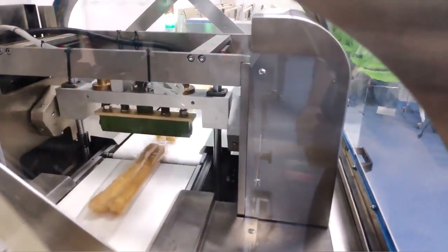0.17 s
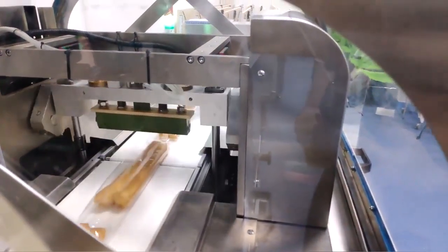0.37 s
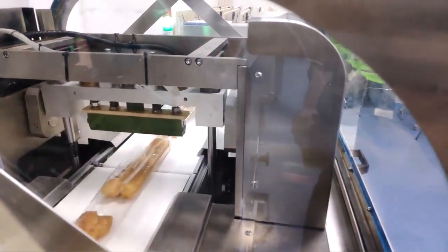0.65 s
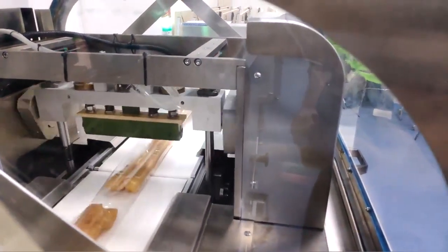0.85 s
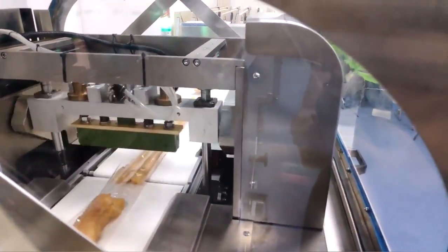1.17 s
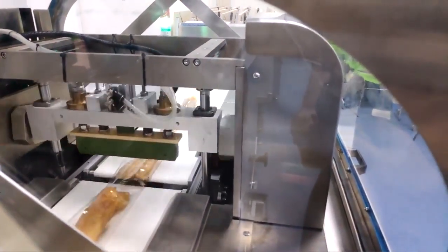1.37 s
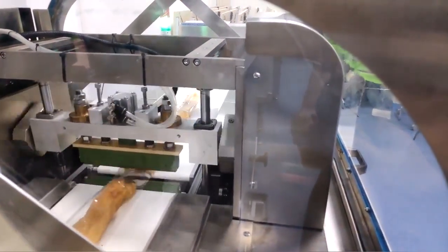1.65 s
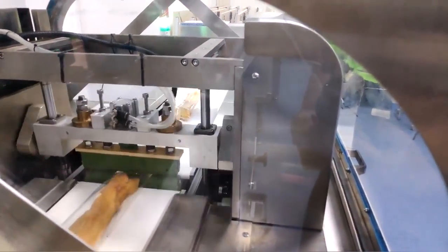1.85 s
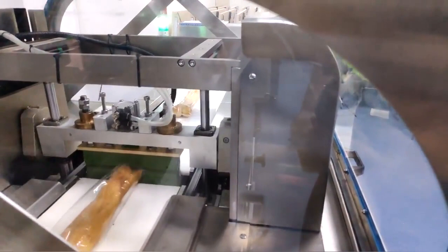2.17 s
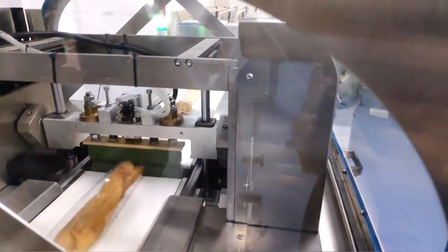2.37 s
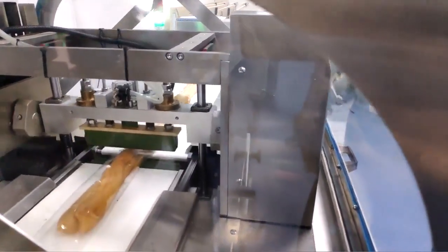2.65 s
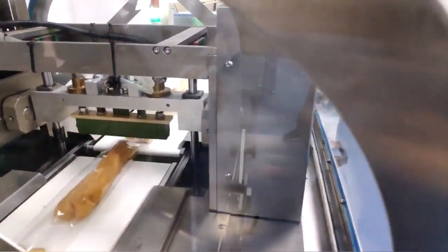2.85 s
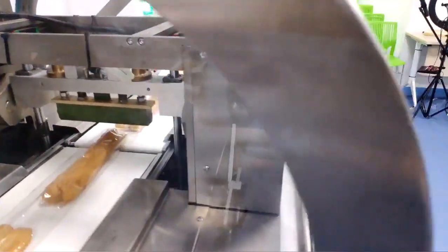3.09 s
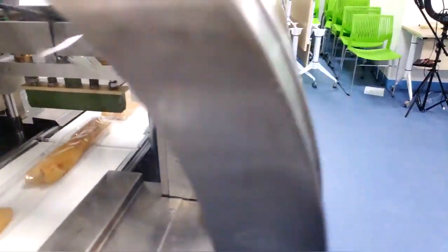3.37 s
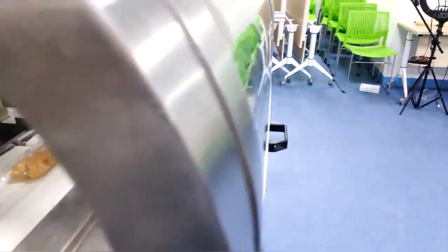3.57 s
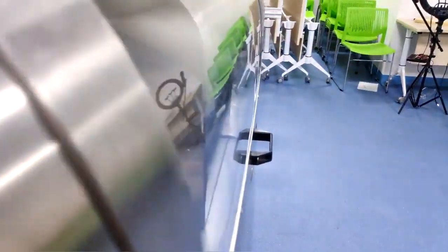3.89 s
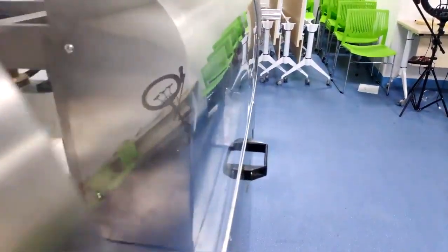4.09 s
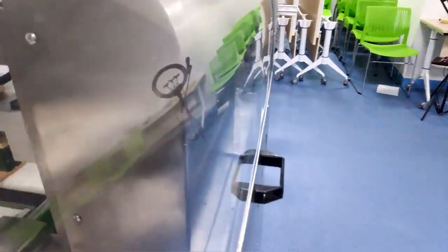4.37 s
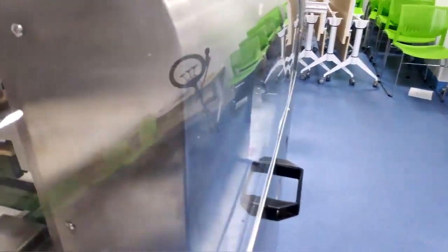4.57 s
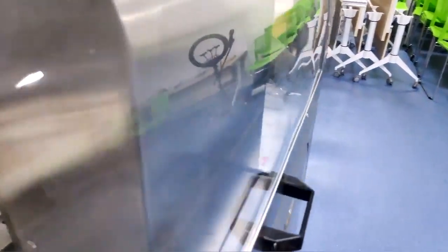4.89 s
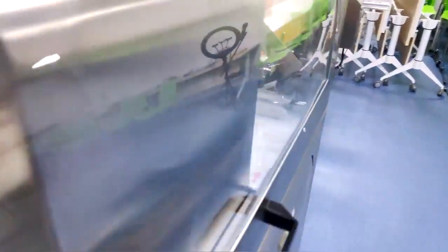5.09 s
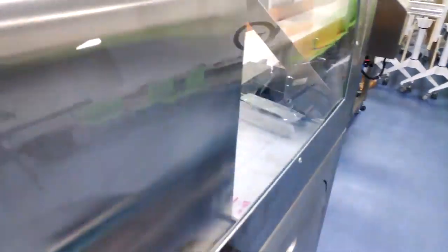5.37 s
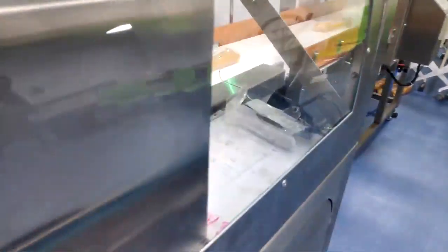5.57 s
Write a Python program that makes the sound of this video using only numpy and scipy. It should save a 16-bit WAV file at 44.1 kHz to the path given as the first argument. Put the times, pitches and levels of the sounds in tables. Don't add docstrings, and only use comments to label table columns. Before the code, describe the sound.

Close-up packaging machine: bright leaking air, snapping film, deep motor throb, and two heavy jaw thuds wrapped in pneumatic whooshes and steel rattle.

```python
import sys
import numpy as np
from scipy import signal
from scipy.fft import rfft, irfft, next_fast_len
from scipy.io import wavfile
from scipy.ndimage import uniform_filter1d, map_coordinates

SR = 44100
rng = np.random.default_rng(int(sys.argv[2]) if len(sys.argv) > 2 else 0)


def how_loud(loudness_db):
    steps = np.asarray(loudness_db, float) / 20
    return 10 ** steps


def digitize_waveform(pressure):
    field = np.atleast_2d(pressure).T
    bounded = np.clip(field, -1, 1)
    quanta = np.round(bounded * 32767).astype(np.int16)
    wavfile.write(sys.argv[1], SR, quanta)


N = 252693

# time_s, closeness_db, jet_left_over_right_db
PHONE_PLACE = [(0, 1, 11), (.8, -0.5, 10.5), (1.4, 0, 10), (1.85, 0.5, 12), (2.3, 0, 10), (2.8, 1, 10),
               (3.15, -2, 9), (3.6, -1, 9.5), (3.9, -1.5, 8.5), (4.2, -1, 10), (4.5, -1, 11.5),
               (5.0, -2.5, 10.5), (5.4, 0.5, 10), (5.73, 0.5, 9)]
# pitch_hz, likeness (0 to 1)
LEFT_RIGHT_LIKENESS = [(40, .99), (65, .87), (150, .87), (300, .95), (450, .88), (700, .55), (1400, 0)]
# pitch_hz, width_hz, level_db
MIC_PORTS = [(9100, 1150, -2.9), (7820, 830, -2.6)]

# time_s, level_db
MOTOR_EFFORT = [(0.0, -41), (0.08, -36), (0.43, -44.5), (0.57, -43.5), (2.25, -40.5), (2.3, -25),
                (2.44, -38), (2.59, -39), (2.95, -44), (2.98, -36), (3.77, -48), (3.86, -37), (4.05, -50),
                (5.17, -38), (5.38, -34), (5.51, -42), (5.62, -39), (5.73, -55)]
# pitch_hz, level_db (per Hz)
FLOOR_TONE = [(10, -32), (20, -5), (40, -1), (48, 1.5), (52, 4.5), (57, -2), (85, -2), (130, -39),
              (300, -120)]
# pitch_hz, level_db (per Hz)
FRAME_TONE = [(40, -48), (75, -4.5), (110, 1), (200, -1), (300, -2), (600, -11.5), (900, -16.5),
              (1300, -57), (2000, -120)]
# pitch_hz, width_hz, level_db
MOTOR_HUMS = [(121, 5.2, -58), (316.7, 5.3, -46.5), (1450, 52, -51.5)]
# start_s, level_db, rise_s, hold_s
JAW_PRESSES = [
    (2.05, -42.5, .05, 0.14),
    (2.285, -32.5, .15, 0.067),
    (4.95, -39.5, 0.028, 0.14),
    (5.201, -34, 0.026, .17),
    (5.446, -41, 0.018, 0.089),
]
# start_s, level_db, rise_s, hold_s
CARRIAGE_STROKES = [
    (2.039, -30, 0.045, .15),
    (2.264, -26, 0.037, 0.2),
    (2.533, -34, .02, 0.16),
    (4.54, -38, 0.054, 0.27),
    (4.977, -31.5, 0.054, .2),
    (5.322, -29, 0.018, 0.2),
]
# start_s, level_db
CARRIAGE_JOLTS = [(.23, -32), (.71, -32.5), (1.33, -41), (1.51, -41), (2.11, -23.5), (2.179, -24.5),
                  (2.33, -20), (2.4, -18), (2.62, -23), (2.77, -26), (3.13, -32), (3.28, -37), (3.64, -46),
                  (3.87, -43), (4.38, -46), (4.44, -45), (5.21, -36), (5.345, -18.5), (5.56, -27)]
# pitch_hz, width_hz, level_db
COVER_TONES = [(405, 85, -8.5), (479.5, 33, 2), (555, 87, -3), (668, 66, 1.5), (770, 64, -3), (853, 60, -5),
               (1094, 170, -12.5)]

# pitch_hz, level_db (per Hz)
JET_TONE = [(900, -120), (3000, -7), (5000, -9), (8000, -3.5), (11000, 1.5), (14000, 5), (17000, -7)]
# pitch_hz, level_db (per Hz)
SIZZLE_TONE = [(9000, -120), (11500, -0.5), (13500, -4.5), (16000, 7.5)]
# pitch_hz, level_db (per Hz)
WASH_TONE = [(300, -120), (900, 4.5), (1500, 3), (2200, -0.5), (3500, -1), (6000, -3.5), (12000, -19.5)]
# start_s, level_db, rise_s, t60_s (time to fall 60 dB), wash_over_blast_db
AIR_BLASTS = [(1.905, -24.5, 0.038, 1.9, -10.5), (1.95, -24.5, 0.034, 1.6, -11),
              (2.28, -16, 0.025, 0.64, -12), (2.395, -19.5, 0.0084, 0.23, -8.5),
              (2.43, -16.5, 0.014, 0.48, -13), (2.52, -26.5, 0.011, 0.83, -10),
              (4.575, -28, 0.032, 5.2, -9), (4.595, -22.5, 0.025, 1.3, -13.5),
              (5.208, -19, 0.018, 1.24, -12), (5.345, -18, .03, 0.44, -16), (5.44, -31, .02, .8, -15)]
# top_s, level_db, brightness_db, t60_s
FILM_FLAPS = [(0.0, -26, 2, 0.28), (.11, -34, -2, 0.46), (.22, -26, 4, 0.15), (.36, -30, 10, .3),
              (.4, -27, -3, 0.26), (.51, -32, -2, 0.46), (.66, -27, 4, .3), (.72, -28.5, -5, 0.87),
              (.91, -26.5, 5, 0.26), (.99, -26.5, -6, 0.93), (1.15, -24.5, -1, 0.57), (1.28, -31, 6, 0.33),
              (1.39, -25, 3, 0.68), (1.71, -28.5, -3, .6), (2.66, -29, -3.5, 0.36), (2.73, -28, -2, 0.16),
              (2.81, -29, 2, 0.11), (2.86, -25.5, -1, 0.16), (2.94, -28, -3, 0.31), (3.09, -38, 20, 0.32),
              (3.26, -35, 0, 1), (3.59, -30, 3, 0.33), (3.71, -30, -3, .2), (3.8, -29, -1, 0.14),
              (3.87, -28.5, -2, 0.44), (3.93, -36, 10, .3), (4.13, -27, 8, .5), (4.21, -39, -3, .2),
              (4.28, -26, -2, 0.35), (4.8, -28, 3, 0.7)]
# start_s, peak_db, left_over_right_db
FILM_SNAPS = [(0.069, -13, 11), (0.0957, -16, 6.0), (0.179, -14, 9), (0.339, -15, 5), (0.401, -12, 4),
              (0.6419, -7, 1), (0.8654, -6, 4), (1.352, -9.5, 9), (1.3778, -10.5, 9), (1.43, -13, -1),
              (4.212, -17, 8), (1.9167, -15, 16), (3.7943, -18, 8), (2.311, -4, 4.5), (2.4, -13, 3),
              (2.7218, -7, -5), (3.854, -17, 14), (2.9233, -25, 5.0), (3.088, -10.5, 2), (3.32, -10, 7),
              (3.4106, -10, 1), (3.591, -12, 0), (3.683, -4.5, 2), (3.902, -14, 12), (4.0695, -13.5, 10),
              (4.127, -16, 7), (4.1774, -9, 7), (3.691, -8, -4), (5.3647, -6, 12), (5.566, -10, 6)]

# start_s, level_db, t60_s
VALVE_PUFFS = [
    (1.908, -29, .3),
    (2.284, -23, .2),
    (2.397, -37, .1),
    (4.575, -32, 0.34),
    (5.214, -33, .2),
    (5.358, -33, .15),
]
# start_s, peak_db, pitch_hz, t60_s
JAW_THUDS = [(2.112, -19, 125, 0.044), (2.293, -2.5, 148, 0.023), (2.295, -18, 303, 0.11),
             (2.304, -13.5, 189, 0.07), (2.318, -24, 121, 0.84), (2.505, -24, 126.5, 0.26),
             (2.536, -8.5, 169, 0.02), (2.47, -32, 74, 0.61), (2.631, -15, 76, 0.034),
             (5.226, -11.5, 187, 0.077), (5.33, -27, 69, 0.33), (3.6, -36, 91.5, 1), (1.15, -32, 146, 0.56),
             (5.33, -17.5, 181, 0.2), (5.34, -25, 224, 0.18), (5.36, -12, 119, 0.039),
             (5.385, -20, 169, 0.026), (5.392, -27, 119, 0.65)]

MACHINE_PAN = how_loud([[-0.7], [0.7]])
STEP_S = 0.001


def unit(x):
    return x / np.sqrt(np.mean(x ** 2) + 1e-20)


def along(points, hz):
    f, v = np.transpose(points)
    return np.interp(np.log(hz + 1), np.log(f + 1), v)


def tone(points):
    return lambda hz: how_loud(along(points, hz))


def curves(rows):
    s, *cols = np.transpose(rows)
    return [np.interp(np.arange(N) / SR, s, c) for c in cols]


def wobble(rate):
    return map_coordinates(rng.standard_normal(int(N * rate / SR) + 4), [np.arange(N) * rate / SR])


def filtered(x, response):
    m = next_fast_len(N + SR // 2)
    return irfft(rfft(x, m) * response(np.fft.rfftfreq(m, 1 / SR)), m)[..., :N]


def peak(f, hz, width):
    return 1j * f * width / (hz * hz - f * f + 1j * f * width)


def rush(gain, patchy_db):
    z = signal.stft(rng.standard_normal((2, N)), nperseg=512)[2]
    field = uniform_filter1d(rng.standard_normal(z.shape[1:]), size=8, axis=0)
    field = uniform_filter1d(field, size=8, axis=1)
    pair = signal.istft(z * how_loud(patchy_db * unit(field)), nperseg=512)[1][:, :N]

    def mid_and_side(hz):
        turn = np.arccos(np.clip(along(LEFT_RIGHT_LIKENESS, hz), -1, 1)) / 2
        return gain(hz) * [np.cos(turn), np.sin(turn)]

    mid, side = filtered(pair, mid_and_side)
    return unit(np.array([mid + side, mid - side]))


def crinkle(rate, spread_db, t60):
    sizes = how_loud(spread_db * np.minimum(rng.exponential(size=N), 2.5))
    starts = (rng.random(N) < rate / SR) * sizes
    return unit(signal.lfilter([1], [1, -how_loud(-60 / (t60 * SR))], starts))


def swell(s, db, rise, hold, t60):
    u = np.arange(0, N / SR + 1, STEP_S) - s
    fall_db = 60 * np.maximum(u - rise - hold, 0) / t60
    return (np.clip(u / rise, 0, 1) * how_loud(db - fall_db)) ** 2


def summed(powers):
    total = sum(powers)
    return np.interp(np.arange(N) / SR, np.arange(len(total)) * STEP_S, total)


def extra_effort():
    load_db = curves(MOTOR_EFFORT)[0]
    return load_db - load_db.mean()


def floor_shake():
    load_db, near_db = curves(MOTOR_EFFORT)[0], curves(PHONE_PLACE)[0]
    motor_hz = 52.3 * (1 + 0.0318 * wobble(3.3))
    turn_db = -40 + 2.2 * wobble(4.5) + 0.34 * extra_effort() + 0.98 * near_db
    turn = how_loud(turn_db) * np.sin(2 * np.pi * np.cumsum(motor_hz) / SR)
    return turn + how_loud(load_db + 1.8) * rush(tone(FLOOR_TONE), patchy_db=-3.0)


def motor_hum():
    near_db = curves(PHONE_PLACE)[0]
    hum = 0
    for hz, width, db in MOTOR_HUMS:
        narrow = rush(lambda f: abs(peak(f, hz, width)) ** 2, patchy_db=-3.5)
        hum = hum + how_loud(db + 1.8 * near_db) * narrow
    return hum


def frame_rumble():
    idle_db = -39 + 0.26 * extra_effort() + 0.54 * curves(PHONE_PLACE)[0]
    presses = summed(swell(*row, t60=0.54) for row in JAW_PRESSES)
    rumble = np.sqrt(how_loud(idle_db) ** 2 + presses)
    return rumble * how_loud(6.5 + 1.6 * wobble(14)) * rush(tone(FRAME_TONE), patchy_db=-0.04)


def carriage_roar():
    strokes = summed(swell(*row, t60=1) for row in CARRIAGE_STROKES)
    jolts = summed(swell(s, db, rise=0.0049, hold=0, t60=0.15) for s, db in CARRIAGE_JOLTS)
    rough = unit(2.5 + crinkle(rate=70, spread_db=3.0, t60=0.08))
    idle = how_loud(-40 + 1.7 * curves(PHONE_PLACE)[0])
    roar = np.sqrt(idle ** 2 + (strokes + jolts) * rough ** 2)

    def covers(f):
        return abs(sum((-1) ** k * how_loud(db) * peak(f, hz, w) for k, (hz, w, db) in enumerate(COVER_TONES)))

    return roar * how_loud(-0.5 + 0.78 * wobble(30.27)) * rush(covers, patchy_db=1.7)


def drive():
    return (floor_shake() + frame_rumble() + carriage_roar() + motor_hum()) * MACHINE_PAN


def film_texture():
    creases = crinkle(rate=220, spread_db=11, t60=0.035)
    ticks = crinkle(rate=87, spread_db=11, t60=0.005)
    return unit(how_loud(0.56 * wobble(32)) * (2 + 0.34 * creases + 0.22 * ticks))


def air():
    near_db, pan_db = curves(PHONE_PLACE)
    near = how_loud(near_db)
    texture = film_texture()

    leak = (near * how_loud(-30 + 0.2 * wobble(15))) ** 2
    blasts = summed(swell(s, db, rise, 0, t60) for s, db, rise, t60, _ in AIR_BLASTS)
    blasts = blasts * texture ** (2 * 0.14)
    flap_rise_s = 0.033
    flaps = [(swell(s - flap_rise_s, db, flap_rise_s, 0, t60), how_loud(bright_db) ** 2)
             for s, db, bright_db, t60 in FILM_FLAPS]

    flow = np.sqrt(texture ** 2 * (leak + summed(p for p, b in flaps)) + blasts)
    jet = flow * how_loud(-3) * rush(tone(JET_TONE), patchy_db=1.3)

    fine_leak = leak * how_loud(4.5 * wobble(4.7))
    fine_flaps = summed(p * b for p, b in flaps)
    fizz = np.sqrt(texture ** 2 * (fine_leak + fine_flaps) + blasts * how_loud(5) ** 2)
    sizzle = fizz * how_loud(-2.5 + np.array([[0.7], [-0.7]])) * rush(tone(SIZZLE_TONE), patchy_db=-0.5)

    lingering = summed(swell(s, db + wash_db, rise, 0, t60 * 1.24)
                       for s, db, rise, t60, wash_db in AIR_BLASTS)
    wash = np.sqrt((near * how_loud(-42)) ** 2 + lingering)
    wash = wash * how_loud(3.5) * rush(tone(WASH_TONE), patchy_db=2.03)

    side = how_loud(np.array([[1], [-1]]) * (pan_db / 2 - 2.5 + 0.18 * wobble(12)))
    return side * (jet + sizzle) + texture ** 0.51 * wash * how_loud([[-0.4], [0.4]])


def film():
    out, t = np.zeros((2, N + SR)), np.arange(SR // 16) / SR
    snap = how_loud(-60 * t / 0.01)
    rustle = 0.22 * how_loud(-60 * t / 0.057)
    shape = (snap + rustle) * (1 - np.exp(-t / 0.0006))
    for s, db, pan_db in FILM_SNAPS:
        burst = shape * np.sign(rng.standard_normal((2, len(t))))
        side_db = np.array([[pan_db / 2 + 1.0], [0.5 - pan_db / 2]])
        out[:, round(s * SR):][:, :len(t)] += burst * how_loud(db - 9 + side_db)
    return filtered(out[:, :N], tone(JET_TONE))


def valves():
    t = np.arange(N) / SR
    flow = np.zeros(N)
    for s, db, t60 in VALVE_PUFFS:
        since = np.maximum(t - s, 0)
        flow += how_loud(db - 60 * since / t60) * (1 - np.exp(-since / 0.0014))
    jet_and_echo = lambda hz: tone(JET_TONE)(hz) + 0.5 * tone(WASH_TONE)(hz)
    return flow * rush(jet_and_echo, patchy_db=-1.5) * how_loud([[0.8], [-0.8]])


def jaws():
    out, t = np.zeros(N + SR), np.arange(SR // 2) / SR
    soft_start = 1 - np.exp(-t / 0.0032)
    for s, db, hz, t60 in JAW_THUDS:
        swing = np.sin(2 * np.pi * hz * t) * soft_start
        out[round(s * SR):][:len(t)] += how_loud(db + 3.5 - 60 * t / t60) * swing
    return out[:N] * MACHINE_PAN


def scene():
    return drive() + air() + film() + valves() + jaws()


def top_cut(x):
    return signal.sosfilt(signal.butter(12, 16440, fs=SR, output="sos"), x)


def record(dry):
    def ports(f):
        return np.array([how_loud(db) * hz * hz / (hz * hz - f * f + 1j * f * w) for hz, w, db in MIC_PORTS])

    heard = filtered(dry, ports)
    rounded = heard / (1 + abs(heard / 0.86) ** 6) ** (1 / 6)
    mix = filtered(rounded, lambda f: f < 15850)
    return top_cut(mix)


dry = scene()
out = record(dry)
digitize_waveform(out)
```